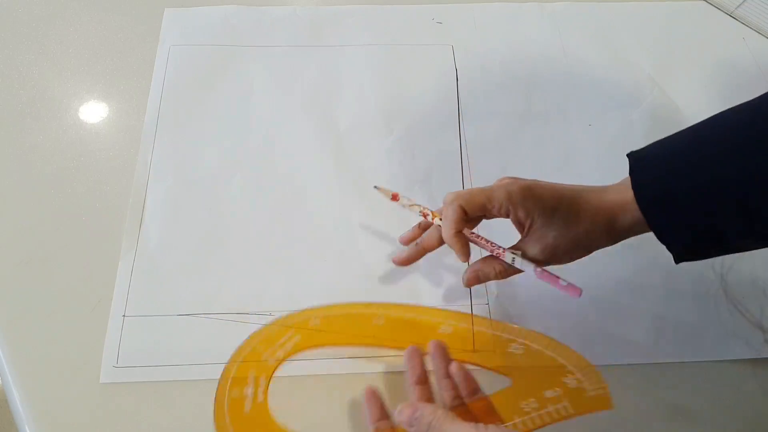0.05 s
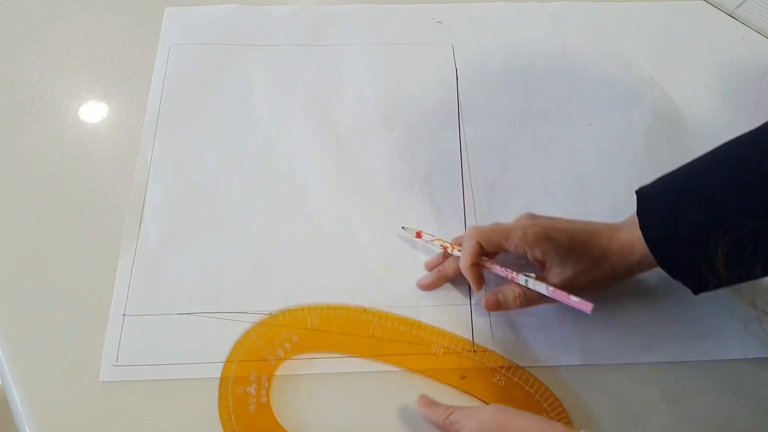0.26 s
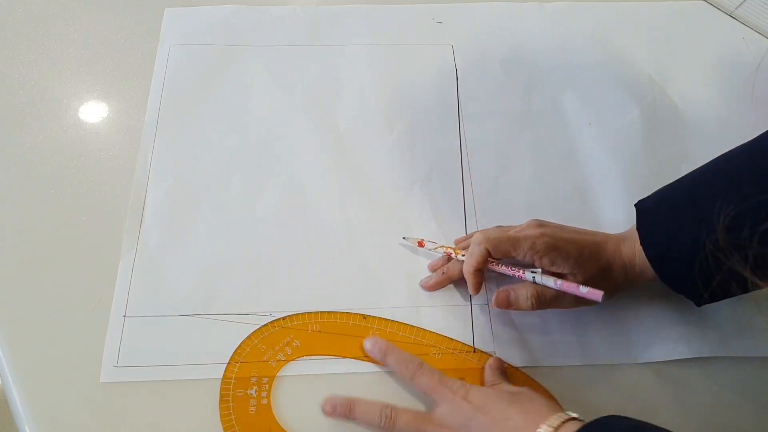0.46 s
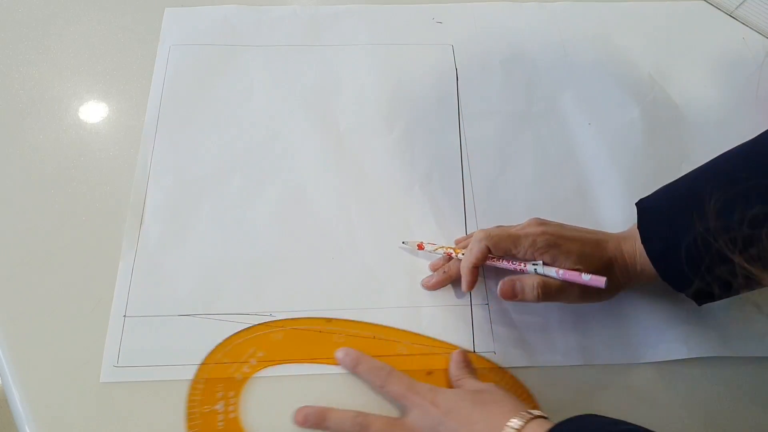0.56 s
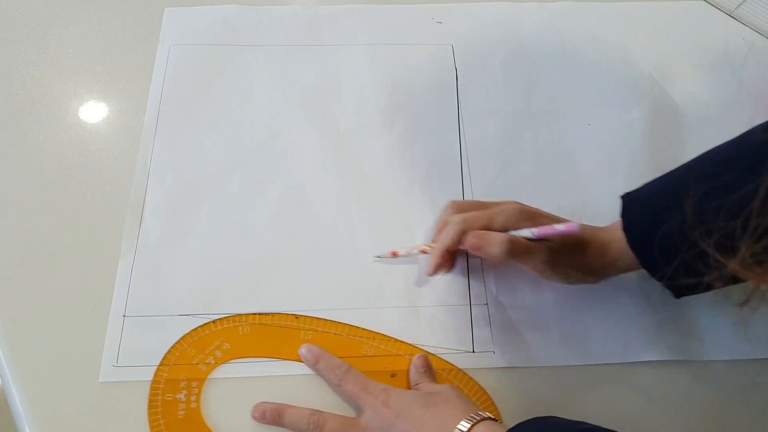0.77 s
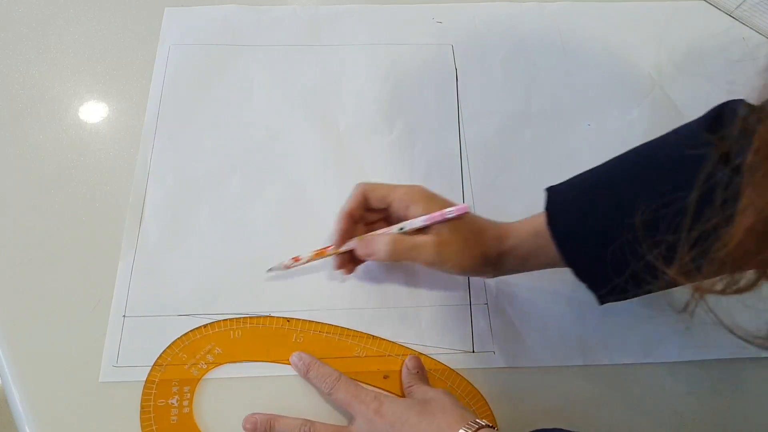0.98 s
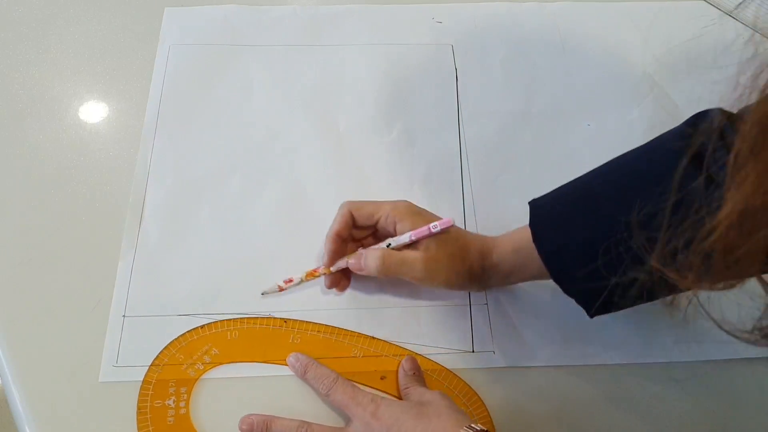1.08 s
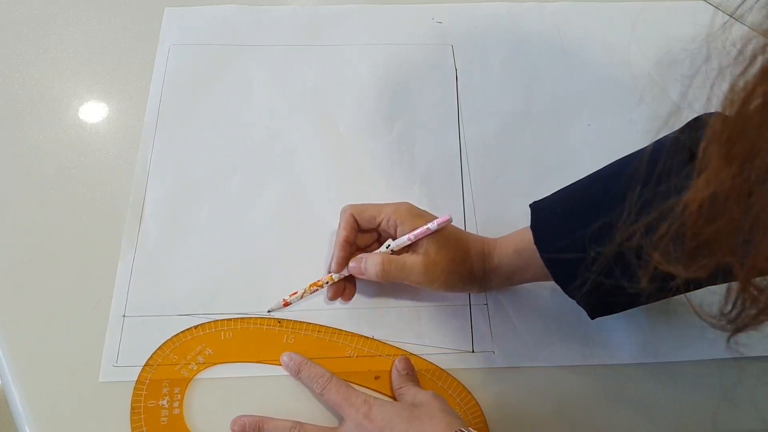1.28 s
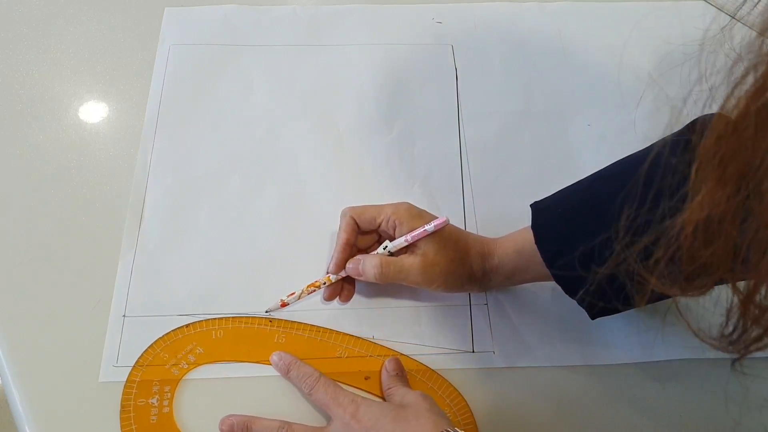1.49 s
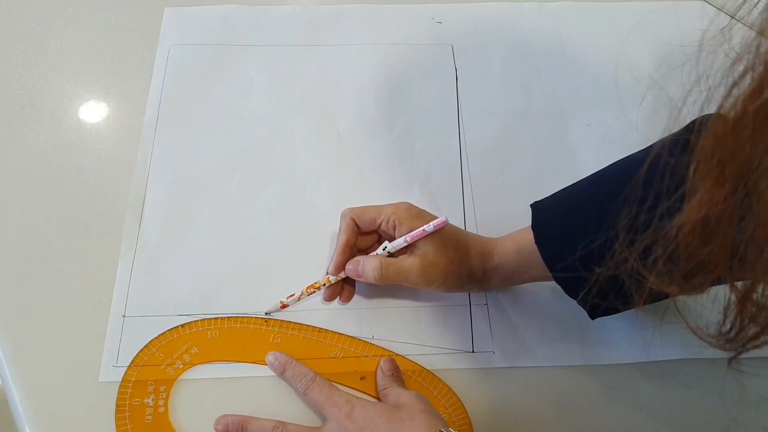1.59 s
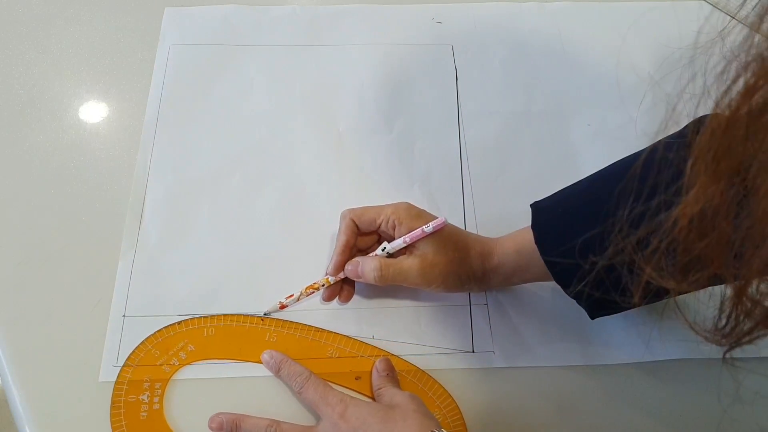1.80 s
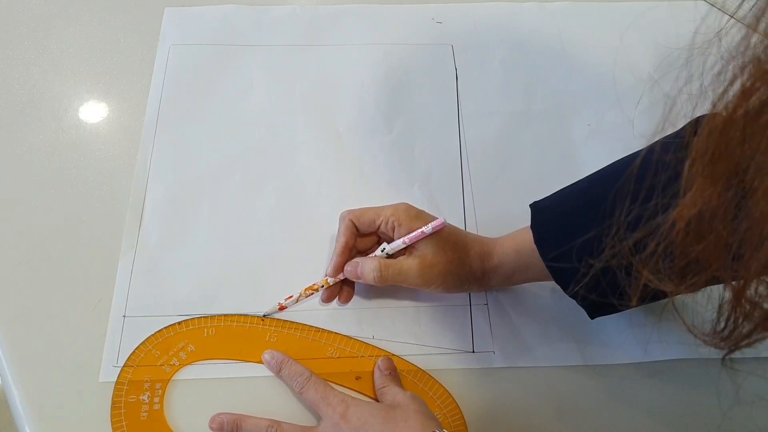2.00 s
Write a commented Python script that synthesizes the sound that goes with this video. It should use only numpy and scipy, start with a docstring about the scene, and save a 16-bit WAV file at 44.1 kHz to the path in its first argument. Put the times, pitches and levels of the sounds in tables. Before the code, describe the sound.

A plastic ruler is set down on a table with two sharp clacks.

```python
"""A plastic ruler is set down on a paper-covered table in a quiet room.
At 0.22 s its edge strikes: a few quick cracks, and the ruler's modes ring.
The edge skids, catching and slipping, with soft knocks. At 0.37 s the whole ruler slaps flat,
chatters and rings again. It is then nudged over the paper with a soft, fading hiss.
A low rush of air and a faint hum, there from the start, remain."""
import sys
import numpy as np
from scipy import signal
from scipy.fft import rfft, irfft
from scipy.io import wavfile

SR = 44100
rng = np.random.default_rng(int(sys.argv[2]) if len(sys.argv) > 2 else 0)


def pcm_store(signal):
    """Save signal as 16-bit PCM."""
    levels = np.round(np.clip(np.atleast_2d(signal), -1, 1) * 32767)
    wavfile.write(sys.argv[1], SR, levels.astype(np.int16).T)


N = 90404
T = np.arange(N) / SR

# contacts, edge first, then flat: start_s, level_db
EDGE_CONTACTS = [(.2195, 3.5), (.2217, 0.5), (.2240, -3), (.2258, -4)]
FLAT_CONTACTS = [(.3732, 7.5), (.3759, 2), (.3808, 6.5), (.3860, 1), (.3893, 0), (.3922, 1), (.4040, -5.5),
                 (.4090, 1.5), (.4165, -9)]
# ring after each clack: start_s, level_db, flat_share, hold_s, pan_db
CLACK_RINGS = [(0.2194, -20.5, 0., 0.0041, -1.5), (0.3726, -17, 0.93, .017, 0)]
# ruler modes: pitch_hz, edge_db, flat_db, linger_db
RULER_MODES = [(1962, -9, -32, -40), (2368, -10, -26, -28), (2454, -24, -9, -21), (2845, -1, -22, -34),
               (2915, -16, -12, -28), (3094, -22, -10, -30), (3248, -8, 0, -7.5), (3355, -1, -16, -15),
               (3480, 1, -5, -16), (3600, -14, -12, -19), (3952, -24, -12, -22), (4126, -8, -18, -26),
               (4268, -22, -12, -17), (4695, -8, -12, -24), (4945, -26, -14, -30), (5054, -26, -11, -28),
               (5410, -9, -12, -27), (5915, -11, -15, -24), (7210, -11, -21, -18), (7888, -18, -16, -23),
               (10898, -26, -13, -30)]
# knocks in the skid: start_s, level_db, pitch_hz
SKID_KNOCKS = [(.2690, -10, 3400), (.2730, -11, 2600), (.2957, -4, 2250), (.3075, -8, 3450),
               (.3198, -11, 1950)]
# envelopes: time_s, level_db
SKID_ENVELOPE = [(.222, -48), (.245, -41), (.272, -31), (.288, -40.5), (.33, -38.5), (.352, -40.5),
                 (.372, -44.5), (.42, -44.5), (.47, -86)]
SLIDE_ENVELOPE = [(0, -52), (.045, -66.5), (.075, -52.5), (.13, -81), (.2, -67), (.305, -60), (.32, -34),
                  (.365, -34.5), (.52, -51), (.62, -54.5), (.76, -60.5), (.93, -65), (1.04, -70),
                  (1.42, -82.5), (1.63, -74.5), (2.05, -89)]
AIR_ENVELOPE = [(0, -50.5), (.8, -51), (1.05, -50.5), (1.35, -52), (1.6, -49.5), (2.05, -49)]
# spectral shapes: freq_hz, relative_db
EDGE_SPECTRUM = [(40, -47.5), (130, -22.5), (450, -12.5), (700, -13.5), (950, -8), (1250, -13),
                 (2100, -8.5), (3200, -2), (4500, -4), (6200, -7.5), (7800, -6), (11500, -13.5),
                 (13500, -20.5), (16000, -20.5)]
FLAT_SPECTRUM = [(40, -46.5), (130, -30.5), (500, -19), (1100, -17), (1900, -17), (2800, -3), (3900, 2.5),
                 (5200, -3.5), (6200, -5), (7800, -6), (11300, -9), (13700, -14.5), (16000, -11)]
SKID_SPECTRUM = [(40, -35.5), (130, -12.5), (300, -13), (480, -1), (750, -6), (1050, -15.5), (1600, -10),
                 (2300, 0), (3100, 0.5), (4100, -6.5), (5100, -3.5), (6500, -13), (16000, -23)]
SLIDE_SPECTRUM = [(500, -15.5), (2200, -4), (4200, 0.5), (5800, -2), (7800, -2), (10000, -7.5),
                  (13000, -4.5), (16000, -11.5)]
AIR_SPECTRUM = [(20, -32), (40, -20), (70, -14), (95, -5), (130, 0.01), (190, -1), (280, 0), (480, -1),
                (660, -4), (900, -10), (1200, -17), (2000, -21), (3200, -29), (5500, -38), (7600, -37),
                (10000, -43), (16000, -42)]
# room decay: freq_hz, t60_s
ROOM_DECAY = [(200, .5), (1000, 0.34), (3300, .5), (7500, 0.39), (11000, .38), (16000, 0.33)]
# left-right likeness of the air: freq_hz, correlation
AIR_CORRELATION = [(30, .85), (120, .95), (300, .85), (700, .62), (1500, .35), (16000, .1)]
# hum partials: pitch_hz, rms_db
HUM_PARTIALS = [(121, -63.5), (639, -63), (860, -70.5)]

CRACK_T60_S, EDGE_PAN_DB, FLAT_PAN_DB = .028, .5, .94
RING_T60_S, LINGER_DB, LINGER_T60_S = .06, -3.5, .52
SKID_GRAINS_PER_S, SKID_RING_DB = 2500, .5
KNOCK_RISE_S, KNOCK_T60_S = .0008, .012
ROOM_DB, ROOM_GAP_S, ROOM_BUILD_S, REFLECTIONS_PER_S = -5, .006, .008, 5000
PORT_LAG_S, PORT_CORRELATION, PORT_PHASE_TURNS = .0001, .46, 1 / 4
CUTOFF_HZ = 15700


def cracks(contacts, spectrum, pan_db):
    """Each contact shakes the plastic: a dense broadband burst, gone in milliseconds."""
    out, t = np.zeros((2, N)), T[:4096]
    fade = amp(-60 * t / CRACK_T60_S)
    for start_s, level_db in contacts:
        bins = rfft(ports(rng.standard_normal((2, len(t)))) * fade)
        whitened = irfft(bins / (abs(bins) + 1e-12), len(t))
        add(out, start_s, amp(level_db) * unit_energy(whitened * np.sqrt(fade)))
    return colour(out, spectrum) * pan(pan_db)


def ringing():
    """Chatter holds the modes up briefly; they drop fast, then linger faintly in the room."""
    out, t = np.zeros((2, N)), T[:SR]
    for start_s, level_db, flat_share, hold_s, pan_db in CLACK_RINGS:
        fade = amp(-60 * np.maximum(t - hold_s, 0) / RING_T60_S)
        linger = amp(LINGER_DB - 60 * t / LINGER_T60_S) * (1 - fade)
        add(out, start_s, amp(level_db) * modes(flat_share, t, fade, linger) * pan(pan_db))
    return out


def modes(flat_share, t, fade, linger=0):
    """Ruler modes, weighted by how it lies: 0 on edge, 1 flat."""
    out = np.zeros((2, len(t)))
    for pitch_hz, edge_db, flat_db, linger_db in RULER_MODES:
        struck_db = edge_db + flat_share * (flat_db - edge_db)
        out += (amp(struck_db) * fade + amp(linger_db) * linger) * tone(pitch_hz, t)
    return out


def skid():
    """The edge catches and slips: tiny grains and a few knocks excite the plastic."""
    t = T[:SR // 10]
    grains = ports(sparse_noise(N, SKID_GRAINS_PER_S, masks=1))
    scrape = unit_rms(colour(grains, SKID_SPECTRUM))
    ring = unit_rms(convolve(grains, modes(0, t, amp(-60 * t / RING_T60_S))))
    skidding = (T > SKID_ENVELOPE[0][0]) & (T < SKID_ENVELOPE[-1][0])
    out = (scrape + amp(SKID_RING_DB) * ring) * envelope(SKID_ENVELOPE) * skidding
    knock_shape = (1 - np.exp(-t / KNOCK_RISE_S)) * amp(-60 * t / KNOCK_T60_S)
    for start_s, level_db, pitch_hz in SKID_KNOCKS:
        knock = tone(pitch_hz, t) * knock_shape
        add(out, start_s, amp(level_db) * knock / np.linalg.norm(knock[0]))
    return out


def slide():
    """Soft hiss of plastic and hand moving over paper."""
    friction = ports(rng.standard_normal((2, N)))
    return unit_rms(colour(friction, SLIDE_SPECTRUM)) * envelope(SLIDE_ENVELOPE)


def room(x):
    """Sparse reflections of random sign; each band decays at its own rate."""
    hz, t, bins = signal.stft(sparse_noise(SR, REFLECTIONS_PER_S, masks=2), SR, nperseg=256)
    decay = amp(-60 * t / at_hz(ROOM_DECAY, hz)[:, None])
    tail = signal.istft(bins * decay, SR)[1][:, :SR]
    build = np.clip((T[:SR] - ROOM_GAP_S) / ROOM_BUILD_S, 0, 1)
    return amp(ROOM_DB) * convolve(x, unit_energy(tail * build))


def air():
    """Low rush of room air, near mono in the bass."""
    hz = np.fft.rfftfreq(N, 1 / SR)
    left, independent = rfft(rng.standard_normal((2, N)))
    right = blend(left, independent, at_hz(AIR_CORRELATION, hz))
    rush = irfft(np.array([left, right]) * amp(at_hz(AIR_SPECTRUM, hz)), N)
    return unit_rms(rush) * envelope(AIR_ENVELOPE)


def hum():
    """Faint steady sines, mono."""
    return sum(amp(rms_db) * np.sqrt(2) * np.sin(2 * np.pi * (pitch_hz * T + rng.random()))
               for pitch_hz, rms_db in HUM_PARTIALS)


def ports(noise):
    """Two microphone ports hear partly the same sound, the right one later."""
    delayed = np.roll(noise[0], round(PORT_LAG_S * SR))
    return np.array([noise[0], blend(delayed, noise[1], PORT_CORRELATION)])


def tone(hz, t):
    """A sine reaching the two ports out of step."""
    phase_turns = rng.random() + np.array([[0], [rng.choice([-1, 1]) * PORT_PHASE_TURNS]])
    return np.sin(2 * np.pi * (hz * t + phase_turns))


def sparse_noise(samples, rate_per_s, masks):
    """Random stereo impulses; timing shared (1 mask) or per channel (2)."""
    return rng.standard_normal((2, samples)) * (rng.random((masks, samples)) < rate_per_s / SR)


def colour(x, spectrum, size=2048):
    """Causal unit-energy filter with the given spectrum."""
    log_gain = np.log(amp(at_hz(spectrum, abs(np.fft.fftfreq(size, 1 / SR)))))
    minimum_phase = np.exp(np.conj(signal.hilbert(log_gain)))
    taps = np.fft.ifft(minimum_phase).real[:size // 2]
    return convolve(x, unit_energy(taps))


def blend(shared, independent, correlation):
    return correlation * shared + np.sqrt(1 - correlation ** 2) * independent


def amp(db):
    return 10 ** (np.asarray(db) / 20)


def unit_rms(x):
    return x / np.sqrt(np.mean(x ** 2) + 1e-20)


def unit_energy(x):
    return x / np.linalg.norm(x, axis=-1, keepdims=True)


def at_hz(points, hz):
    """Table lookup on a log-frequency axis."""
    freq_hz, value = np.transpose(points)
    return np.interp(np.log(hz + 1), np.log(freq_hz + 1), value)


def envelope(points):
    return amp(np.interp(T, *np.transpose(points)))


def pan(left_over_right_db):
    return amp(np.array([[left_over_right_db], [-left_over_right_db]]) / 2)


def add(mix, start_s, sound):
    part = mix[:, round(start_s * SR):][:, :sound.shape[1]]
    part += sound[:, :part.shape[1]]


def convolve(x, response):
    return signal.fftconvolve(x, np.atleast_2d(response), axes=1)[:, :N]


def scene():
    """Ruler, room, background."""
    edge_strike = cracks(EDGE_CONTACTS, EDGE_SPECTRUM, EDGE_PAN_DB)
    flat_slap = cracks(FLAT_CONTACTS, FLAT_SPECTRUM, FLAT_PAN_DB)
    ruler = edge_strike + flat_slap + skid() + slide()
    return ruler + room(ruler) + ringing() + air() + hum()


def record(dry):
    """Low-pass band limit."""
    lowpass = signal.firwin(255, CUTOFF_HZ, window=("kaiser", 8), fs=SR)
    return signal.oaconvolve(dry, lowpass[None], "same")


dry = scene()
out = record(dry)
pcm_store(out)
```